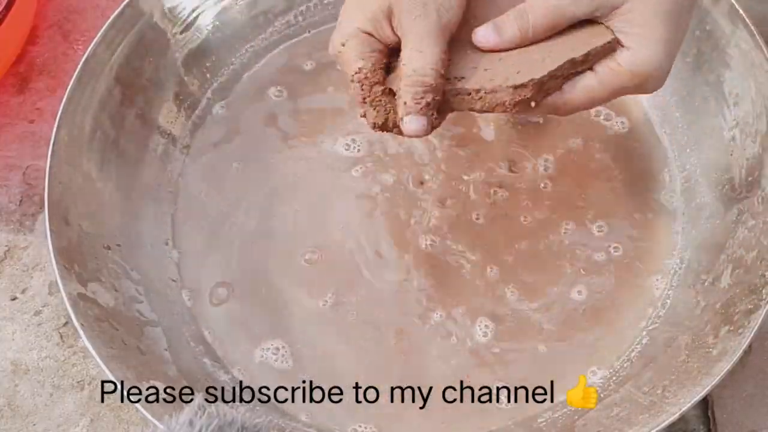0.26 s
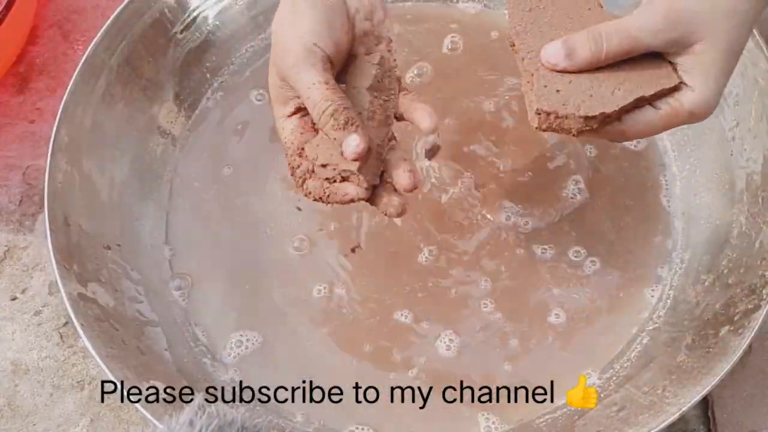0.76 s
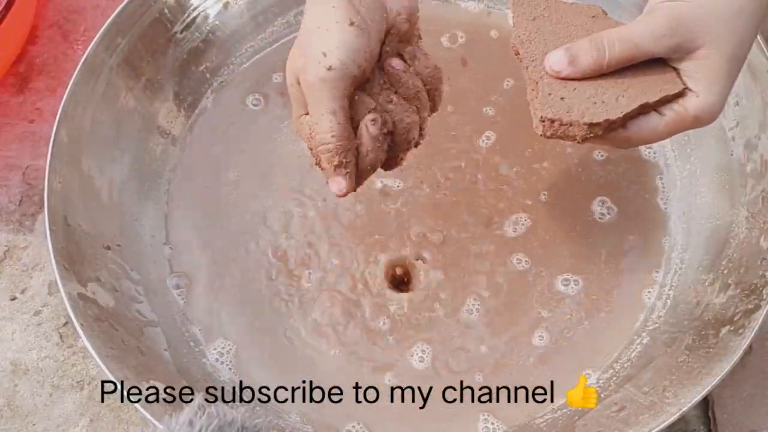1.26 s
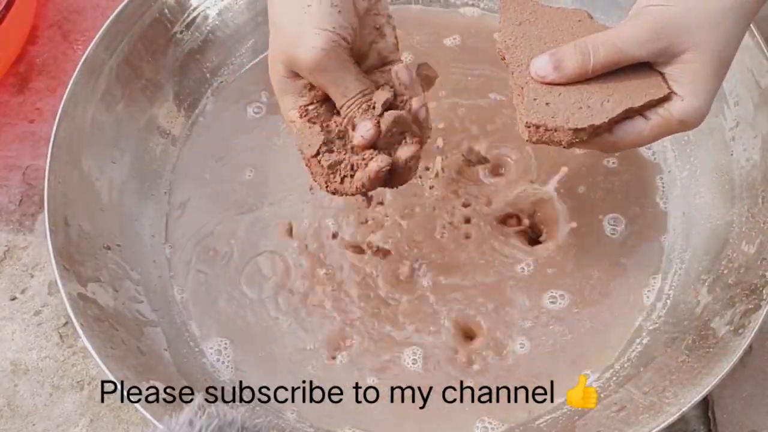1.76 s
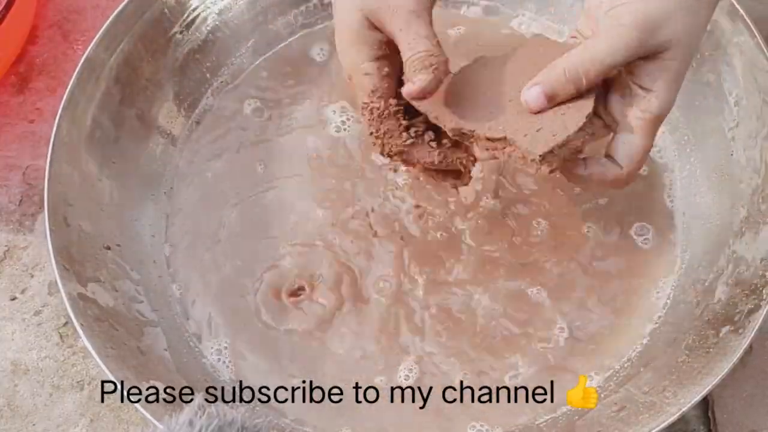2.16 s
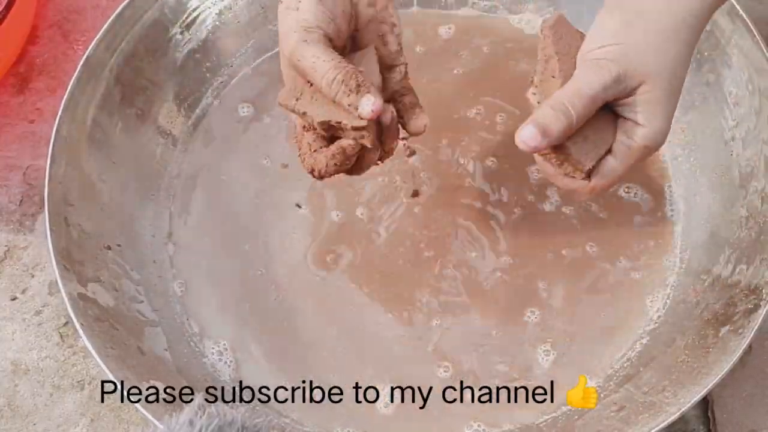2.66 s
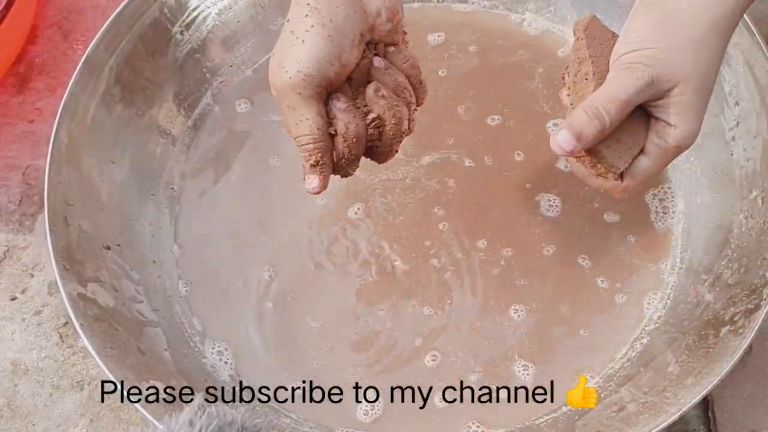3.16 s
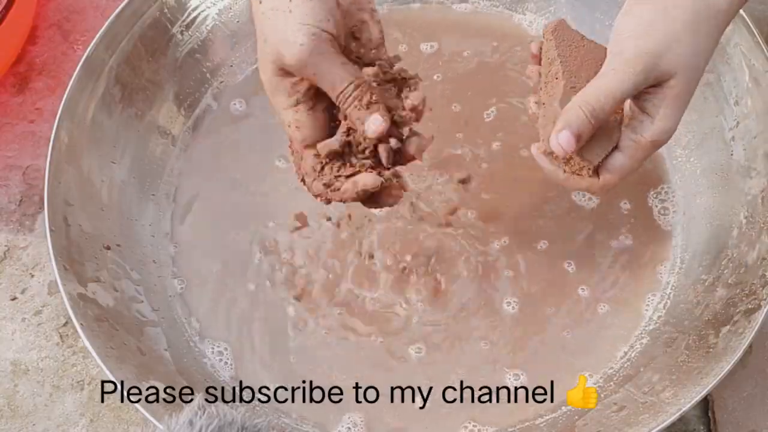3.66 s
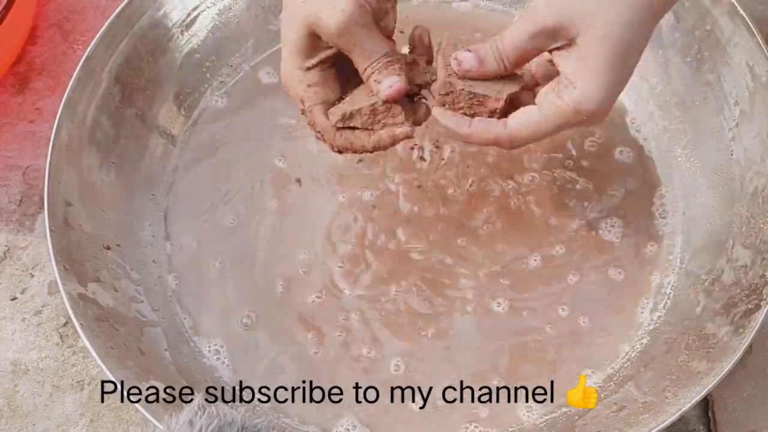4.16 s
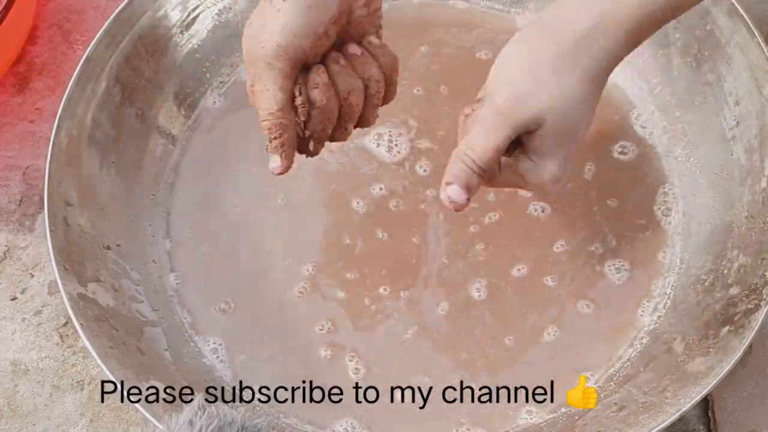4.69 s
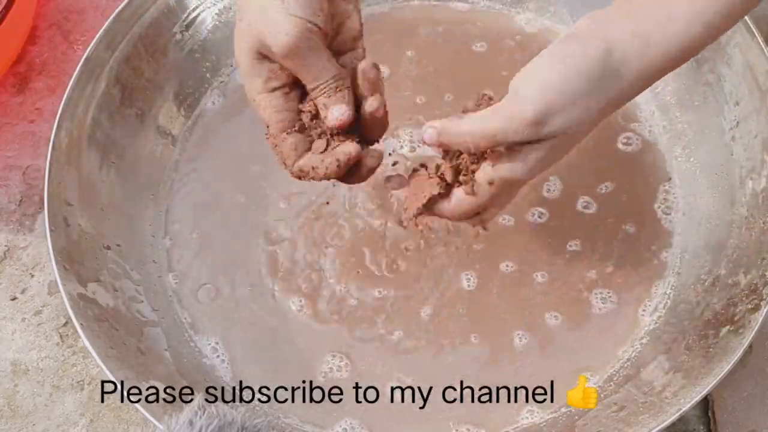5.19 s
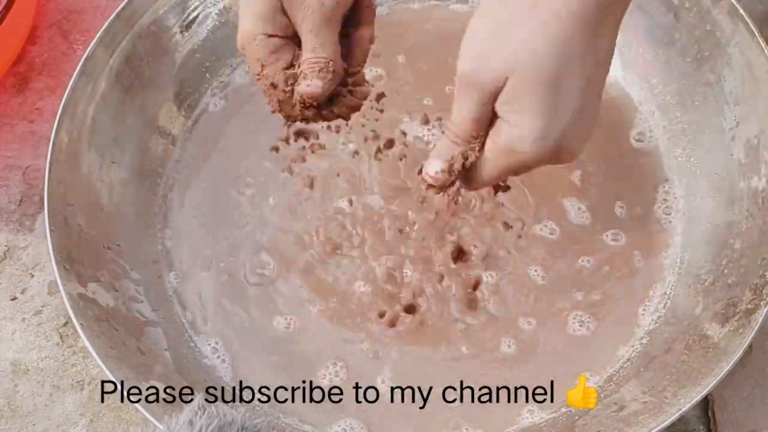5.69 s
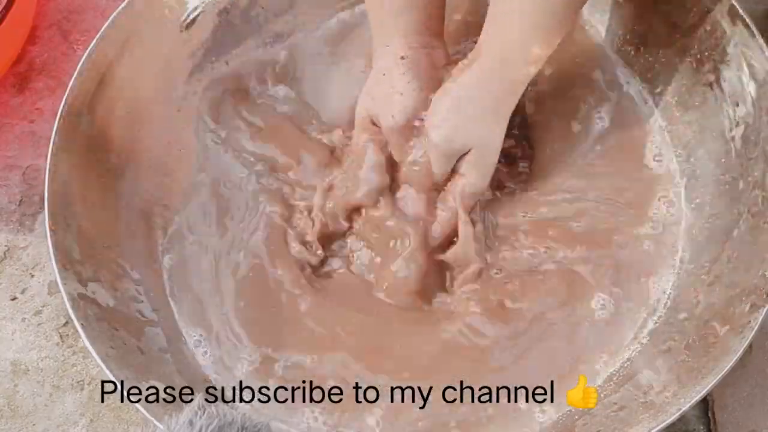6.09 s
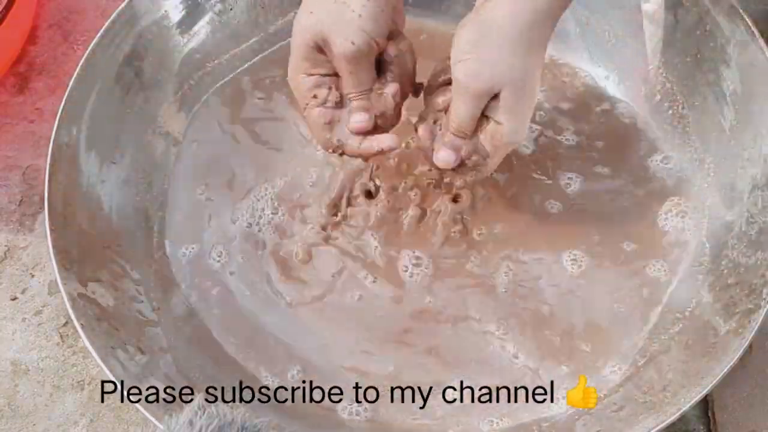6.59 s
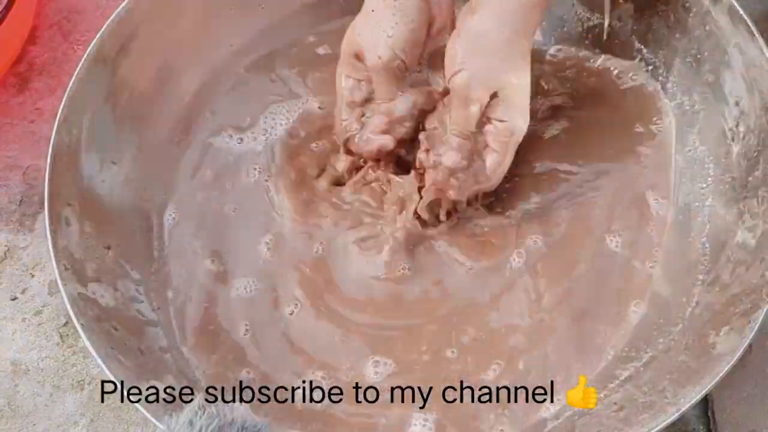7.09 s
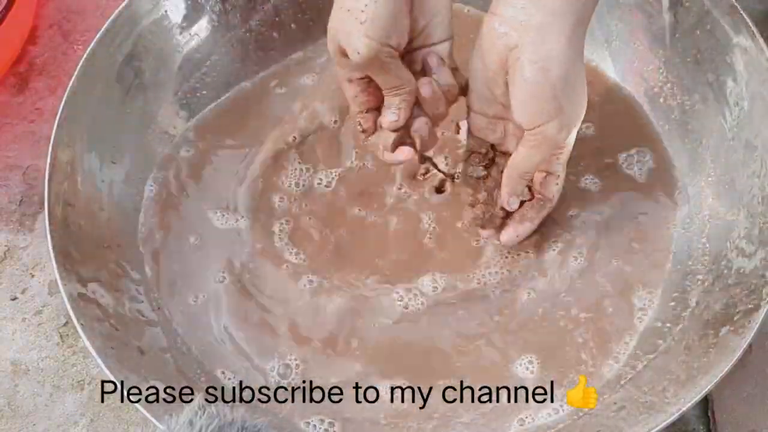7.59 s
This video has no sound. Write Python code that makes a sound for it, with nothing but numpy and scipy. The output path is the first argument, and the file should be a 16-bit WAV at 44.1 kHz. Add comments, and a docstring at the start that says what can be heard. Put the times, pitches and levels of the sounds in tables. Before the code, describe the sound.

Hands crumble a wet slab over a steel basin of water. Crumbs patter onto the surface in short showers, with sharp ticks, bubbly plops and a gritty fizz, and the fingers rasp softly in between. For the last two seconds or so the hands slosh and splash in the water. The sounds seem close, and a low rumble like wind or distant traffic lies underneath throughout.

```python
"""At a steel basin of water, hands crumble a wet slab. Crumbs and drops strike the surface with sharp
ticks, trap bubbles that plop and raise a gritty fizz; then the hands slosh in the water. Ticks are noise
bursts over a short ring, bubbles are damped sines, and fizz and slosh are patchy noise with swarms of
tiny bubbles. A low rumble, probably wind or traffic, lies under it all."""
import sys
import numpy as np
from scipy import signal
from scipy.fft import rfft, irfft, next_fast_len
from scipy.io import wavfile
from scipy.ndimage import uniform_filter1d, map_coordinates

SR = 44100
rng = np.random.default_rng(int(sys.argv[2]) if len(sys.argv) > 2 else 0)


def digitize_waveform(pressure):
    """Quantize a signal to 16-bit integers and store it at the path in sys.argv[1].

    Rows of a 2-D input are taken as channels; values are limited to [-1, 1].
    """
    field = np.atleast_2d(pressure).T
    bounded = np.clip(field, -1, 1)
    quanta = np.round(bounded * 32767).astype(np.int16)
    wavfile.write(sys.argv[1], SR, quanta)


N = 345744

# crumbs hitting the water: t/s, level/dB, ring f/Hz, edge level/dB (relative; higher is sharper)
CRUMB_HITS = [(0.0389, -13, 3470, -20), (0.063, -13, 2000, -34), (0.156, -10.5, 3980, -41),
              (0.168, -19, 1860, -16.5), (0.2588, -17.5, 2620, -44), (0.4146, -15, 4000, -39),
              (0.6913, -12, 2480, -31), (0.736, -18.5, 3900, -21.5), (0.852, -32.5, 4060, -19.5),
              (1.05, -22.5, 2190, -26.5), (1.2292, -15, 2000, -24), (1.3286, -8.5, 4180, -45),
              (1.3634, -15.5, 4870, -23.5), (1.441, -10, 2980, -52), (1.509, -1.5, 2970, -41),
              (1.52, -8.5, 2960, -45.5), (1.6792, -6.5, 4500, -34.5), (1.8314, -10, 3850, -20),
              (1.879, -24, 4230, -21.5), (1.9111, -3.5, 3820, -22), (1.981, -22, 4360, -18),
              (2.001, -6, 4140, -46), (2.077, -8, 2740, -36), (2.16, -18, 1780, -22.5),
              (2.3445, -10.5, 3670, -20), (2.369, -13, 4080, -28), (2.426, -14.5, 2000, -40.5),
              (2.497, -30, 3280, -26.5), (2.74, -19.5, 3360, -41), (3.045, -12, 3600, -21.5),
              (3.4428, -5.5, 3680, -41.5), (3.469, -6, 4150, -31), (3.5367, -8.5, 6400, -25.5),
              (3.6421, -2.5, 4140, -36.5), (3.7182, -26.5, 4160, -52), (3.7485, -7.5, 4690, -22.5),
              (3.7829, -2.5, 3040, -41.5), (3.888, -9.5, 4900, -30), (3.9584, -4, 6850, -27),
              (4.015, -2.5, 4400, -42), (4.08, -28.5, 2160, -4.5), (4.111, -11, 5040, -27.5),
              (4.2824, -15.5, 1866, -41), (4.401, -19.5, 4400, -40.5), (4.468, -21.5, 4750, -39),
              (4.518, -19, 4000, -37), (4.687, -11, 3090, -34), (5.112, -9.5, 5570, -32.5),
              (5.181, -20.5, 3200, -19.5), (5.385, -8, 1560, -32), (5.3902, -24, 3800, -29),
              (5.4495, -11.5, 3700, -23.5), (5.6146, -12.5, 5000, -16.5), (5.6345, -19, 4200, -18),
              (5.674, -8.5, 4250, -40.5), (5.7104, -25, 4270, -26), (5.738, -26, 3620, -18.5),
              (5.7534, -28.5, 4300, -14), (5.855, -6, 3800, -36), (5.9118, -10.5, 5000, -21.5),
              (6.1482, -12, 2600, -45), (6.1679, -1, 4460, -37.5), (6.261, -11.5, 4530, -18.5),
              (6.431, -11, 3800, -47), (6.4592, -11.5, 5270, -24.5), (6.505, -5, 3160, -39),
              (6.526, -4, 3670, -47.5), (6.559, -12, 2940, -30), (6.6282, -29, 4670, -11),
              (6.7302, -9, 3490, -39), (6.796, -14, 3550, -39), (6.8947, -11, 5400, -47),
              (7.051, -18.5, 3900, -21), (7.075, -14, 3200, -52), (7.155, -13.5, 5900, -28),
              (7.244, -8.5, 3980, -47), (7.3002, -9.5, 4400, -27), (7.444, -19, 3700, -17.5),
              (7.483, -11, 4100, -39), (7.645, -18, 2560, -42), (7.683, -13.5, 3620, -43.5)]
# EQ of the spray: f/Hz, level/dB
SPRAY_EQ = [(600, 0.5), (1500, -5), (2500, -7.5), (4200, -4.5), (6800, -5.5), (7700, -20.5), (12000, -44.5),
            (16200, -55.5)]
# EQ of the thin top of a sharp splash: f/Hz, level/dB
EDGE_EQ = [(5000, -34), (8000, -4.5), (13500, -10.5), (15400, -10), (16000, -29.5)]


def crumb_ticks():
    """Each crumb cracks the surface, rings a tiny bubble and throws a short spray of its own colour."""
    s, db, hz, edge_db = shed_bits(*np.transpose(CRUMB_HITS)[:, :, None])
    spray_cycles, snap_cycles = 67, 17.3  # to fall 60 dB: small, high drops die soonest
    t = np.arange(2000) / SR
    taper = np.hanning(2 * len(t))[len(t):]
    noise = rng.standard_normal((len(s), 3, len(t)))
    crack = decay(t, 0.0045)
    tail = decay(t, np.clip(spray_cycles / hz, .005, .15)) * (1 - np.exp(-t / 0.00077)) * taper
    burst = noise[:, 0] * (amp(2) * crack + amp(-2.5) * tail)
    tone = np.sin(2 * np.pi * hz * t)
    snap = tone * decay(t, snap_cycles / hz) * (1 - np.exp(-3 * t * hz))
    impact = amp(0.49 * (edge_db + 35.5)) * (burst + amp(2.5) * snap)
    # the surface rings in a noise band about 1 kHz wide, longer after a dull blow
    band = unit(uniform_filter1d(noise[:, 2], size=44, axis=1)) * tone
    ring_s = 0.068 * amp(-0.6 * (edge_db + 51.5))
    ring = band * decay(t, ring_s) * (1 - np.exp(-t / 0.0012)) * taper
    spray = place(s[:, 0], amp(db) * (impact + amp(-4) * ring))
    edge = place(s[:, 0], amp(db + edge_db + 15) * noise[:, 1] * decay(t, 0.0074))
    # the duller the blow, the louder and longer its plink
    plink_db = db - 8 - 0.77 * (edge_db + 39.5)
    plink_cycles = 7 * amp(-0.3 * (edge_db + 47))
    plink = bubbles(s[:, 0], plink_db[:, 0], hz[:, 0], plink_cycles, rise=0.0084, samples=1500)
    return coloured(spray, SPRAY_EQ) + coloured(edge, EDGE_EQ) + plink


def shed_bits(s, db, hz, edge_db):
    """Every crumb sheds two quieter bits: one lands just before it, one after, each with its own ring."""
    before_s, after_s = 0.006, 0.014
    when, smallness, tuning = rng.uniform(size=(len(s), 3, 2)).transpose(1, 0, 2)
    bit_s = np.maximum(s + (.3 + .7 * when) * [-before_s, after_s], 0)
    bit_db = db - 19 * (.5 + smallness)
    bit_hz = hz * (.8 + .5 * tuning)
    bit_edge_db = edge_db - 6 * smallness
    pairs = zip((s, db, hz, edge_db), (bit_s, bit_db, bit_hz, bit_edge_db))
    return [np.concatenate([crumb, bits.T.reshape(-1, 1)]) for crumb, bits in pairs]


def plops():
    """Bigger lumps trap bigger, lower bubbles, each with a weaker companion a moment later."""
    # large trapped bubbles: t/s, level/dB, f/Hz
    trapped = [(0.01, -9.5, 1030), (0.038, -4, 608), (1.227, -12, 763), (1.307, -22, 2530),
               (1.397, -15, 1320), (1.629, -12.5, 1000), (1.831, -3, 1007), (1.86, -9, 583),
               (2.294, -8.5, 990), (2.332, -10, 640), (3.454, -26, 2170), (3.538, -15.5, 1300),
               (3.642, -1.5, 525), (3.754, -5.5, 714), (3.827, -7.5, 960), (3.886, -3, 543),
               (3.931, -11, 596), (3.961, -13.5, 1060), (4.023, -9, 660), (4.113, -9.5, 626),
               (4.467, -13.5, 930), (5.116, -3.5, 796), (5.287, -18.5, 2410), (5.309, -17, 1810),
               (5.342, -26, 1950), (5.385, -7, 538), (5.677, -11.5, 1760), (5.763, -19, 1460),
               (5.813, -19, 1400), (5.844, -16, 1010), (5.857, -10, 990), (5.874, -11, 1150),
               (5.9, -11, 1370), (6.236, -15.5, 2230), (6.464, -9, 1030), (6.51, 0.5, 1020),
               (6.773, -13, 1980), (6.809, -13.5, 1670), (6.819, -12.5, 1080), (6.834, -6.5, 1060),
               (6.866, -13.5, 2320), (6.975, -13, 2030), (6.977, -14, 1020), (7.053, -6.5, 835),
               (7.072, -8, 850), (7.0858, -17, 2040), (7.117, -15, 1710), (7.142, -12, 910),
               (7.1549, -10.5, 1860), (7.296, -10, 1180), (7.712, -8, 915)]
    s, db, hz = np.transpose(trapped)
    lag, detune = rng.uniform(size=(len(s), 2)).T
    companion_hz = hz * (.87 + .3 * detune)
    companion = bubbles(s + 0.009 * lag, db - 5, companion_hz, cycles=2.6, rise=0.025, samples=1500)
    return bubbles(s, db, hz, cycles=3 * hz[:, None] / 1000, rise=0.013, samples=1500) + companion


def fizz_and_slosh():
    """Grit and droplets patter, fingers rasp and the water churns, all riding the hands' movement."""
    # EQ of fingers grinding wet grit: f/Hz, level/dB
    rasp_eq = [(2200, -34.5), (3500, 4.5), (4500, 6.5), (6500, -5), (7600, -51.5)]
    churn_eq = [(400, -31), (900, -7), (1800, -10), (3200, -24), (6000, -47.5)]  # f/Hz, level/dB
    fizz_db, slosh_db = stirring()
    flutter = amp(3.2 * wobble(42) + 5.5 * np.clip(wobble(160), -3, 1.8))
    hiss = unit(coloured(flutter * patchy(depth_db=8, bins=8, frames=3), SPRAY_EQ))
    grit = swarm(count=3000, hz=4060, octaves=0.59, spread_db=8.5, cycles=1.55, samples=250)
    grit = unit(coloured(grit, SPRAY_EQ))
    burble = swarm(count=4500, hz=1521, octaves=0.674, spread_db=5, cycles=5.9, samples=1200)
    churn = unit(coloured(patchy(depth_db=11, bins=3, frames=3), churn_eq))
    rasp = unit(coloured(patchy(depth_db=6.5, bins=6, frames=3), rasp_eq))
    spatter = amp(-1.5) * hiss + amp(0.5) * grit + amp(-17) * fine_spatter()
    # sharp spatter belongs to the busy moments; gentle squeezing mostly rasps
    busy = amp(0.6 * np.clip(fizz_db + 36, -30, 6))
    fizz = amp(-2) * rasp + busy * spatter
    slosh = amp(0.2) * burble + amp(0.5) * churn
    return amp(fizz_db) * fizz + amp(slosh_db) * slosh


def stirring():
    """Fizz and slosh envelopes in dB: each shower sets in fast, holds and fades; the loudest rules."""
    # crumb showers, finger rasps and hand splashes: t/s, hold/s, fizz level/dB, slosh over fizz/dB
    showers = [(0.0, 0.11, -35, 2), (0.233, 0.048, -37, -8), (0.288, 0.055, -46.5, -15.5),
               (0.689, 0.0072, -37, 2.5), (0.827, 0.11, -53.5, -26), (1.023, 0.079, -45, -21),
               (1.242, 0.081, -42, -16.5), (1.388, 0.071, -41.5, -2), (1.495, 0.052, -35.5, -7),
               (1.566, 0.15, -38.5, -5.5), (1.762, 0.15, -37.5, -2.5), (1.955, 0.22, -36.5, -10.5),
               (2.256, 0.091, -33.5, -2.5), (2.834, 0.19, -54, -14.5), (3.022, 0.2, -43.5, -5),
               (3.412, 0.26, -44, -3.5), (3.754, 0.29, -35, -0.5), (4.103, 0.06, -42.5, -5),
               (4.524, 0.25, -46, -3), (4.909, 0.14, -39.5, -3), (5.234, 0.09, -41, -16),
               (5.364, 0.026, -34, -10.5), (5.423, 0.16, -42, -3.5), (5.657, 0.307, -33.5, -6.5),
               (6, 0.19, -36, -4), (6.159, 0.12, -33, -2.5), (6.295, 0.17, -39, -7.5),
               (6.463, 0.133, -34.5, 0), (6.623, 0.12, -39.5, 1.5), (6.794, 0.09, -31, -3.5),
               (6.923, 0.05, -37, -9), (6.969, 0.065, -34, 3), (7.051, 0.12, -30, 1.5),
               (7.221, 0.23, -36.5, -1.5), (7.532, 0.43, -41, -3)]
    attack_db_per_s, release_db_per_s = 708, 362
    still_fizz_db, still_slosh_db = -63, -58  # the water left alone
    t = np.arange(0, N, 64) / SR
    s, hold, held_db, slosh_over_db = np.transpose(showers)[:, :, None]
    attack_db = attack_db_per_s * np.maximum(s - t, 0)
    release_db = release_db_per_s * np.maximum(t - s - hold, 0)
    shower_db = held_db - attack_db - release_db
    fizz_db = np.maximum(shower_db.max(0), still_fizz_db)
    slosh_db = np.maximum((shower_db + slosh_over_db).max(0), still_slosh_db)
    return per_sample(t, fizz_db), per_sample(t, slosh_db)


def fine_spatter():
    """The finest droplets crackle around the sharpest blows and are gone between them."""
    count, fade_db_per_s = 1300, 254
    drops = np.zeros(N)
    drops[rng.integers(0, N, size=count)] = amp(7.8 * np.minimum(rng.exponential(1, size=count), 2.5))
    envelope = signal.fftconvolve(drops, decay(np.arange(400) / SR, 0.0058))[:N]
    crackle = unit(coloured(envelope * rng.standard_normal(N), EDGE_EQ))
    t = np.arange(0, N, 64) / SR
    s, db, _, edge_db = np.transpose(CRUMB_HITS)[:, :, None]
    near_blow_db = 0.5 * (db + edge_db + 37.5) - fade_db_per_s * np.abs(t - s)
    return amp(per_sample(t, near_blow_db.max(0))) * crackle


def rumble():
    """Probably wind or traffic: two wavering beds of low noise that swell briefly three times."""
    # EQ of the deep bed: f/Hz, level/dB
    deep_eq = [(20, -25.5), (81, 0), (204, -7.5), (300, -21.5), (390, -28), (660, -120)]
    # EQ of the upper bed: f/Hz, level/dB
    upper_eq = [(120, -36.5), (220, 3.5), (500, -6), (1000, -19.5), (1500, -34), (2500, -47.5), (6000, -78)]
    # swells of the rumble: t/s, hold/s, deep lift/dB, upper lift/dB, release/s
    swells = [(0.0, 0.086, 5, 11, 0.18), (0.628, 0.017, 7.5, 2.5, 0.045), (3.031, 0.079, 6, 12.5, 0.14)]
    attack_s, climb_db_per_s = 0.011, 0.5332
    t = np.arange(N) / SR
    s, hold, deep_lift, upper_lift, release_s = np.transpose(swells)[:, :, None]
    swell = np.exp(-np.maximum(s - t, 0) / attack_s - np.maximum(t - s - hold, 0) / release_s)
    deep = unit(coloured(rng.standard_normal(N), deep_eq))
    upper = unit(coloured(rng.standard_normal(N), upper_eq))
    deep_db = -19 + (deep_lift * swell).sum(0) + 0.36 * wobble(11)
    upper_db = -30.5 + climb_db_per_s * t + (upper_lift * swell).sum(0) + 1.1 * wobble(14)
    return amp(deep_db) * deep + amp(upper_db) * upper


def bubbles(s, db, hz, cycles, rise, samples):
    """Trapped air rings as damped sines; most climb a little in pitch, each by its own amount."""
    turns = np.arange(samples) / SR * hz[:, None]
    decay_cycles = cycles * 2 ** (0.5 * np.clip(rng.standard_normal((len(s), 1)), -2, 0.7))
    age = turns / decay_cycles
    glide = rise * (1 + 1.74 * rng.standard_normal((len(s), 1)))
    tone = np.sin(2 * np.pi * turns * (1 + glide * np.minimum(age, 3)))
    envelope = np.exp(-age) * (1 - np.exp(-4 * turns)) * np.hanning(2 * samples)[samples:]
    return place(s, amp(db)[:, None] * tone * envelope)


def swarm(count, hz, octaves, spread_db, cycles, samples):
    """Many small bubbles at random moments, a few far louder than the rest; rms 1."""
    s = rng.uniform(0, N / SR, count)
    pitch = np.clip(hz * 2 ** (octaves * rng.standard_normal(count)), 300, 6400)
    db = spread_db * np.minimum(rng.exponential(1, count), 3.1)
    return unit(bubbles(s, db, pitch, cycles, rise=0.019, samples=samples))


def patchy(depth_db, bins, frames):
    """Noise broken into small patches of pitch and time, as from many overlapping droplets."""
    spectrum = signal.stft(rng.standard_normal(N), nperseg=256)[2]
    patches = uniform_filter1d(rng.standard_normal(spectrum.shape), size=bins, axis=0)
    patches = uniform_filter1d(patches, size=frames, axis=1)
    return signal.istft(spectrum * amp(depth_db * unit(patches)), nperseg=256)[1][:N]


def coloured(x, eq):
    """x through a minimum-phase EQ drawn by points of f/Hz, level/dB."""
    m = next_fast_len(N + SR // 2)
    hz, db = np.transpose(eq)
    gain = amp(np.interp(np.log(np.fft.rfftfreq(m, 1 / SR) + 1), np.log(hz), db))
    cepstrum = irfft(np.log(gain), m)
    cepstrum[1:m // 2] *= 2
    cepstrum[m // 2 + 1:] = 0
    return irfft(rfft(x, m) * np.exp(rfft(cepstrum)), m)[:N]


def place(s, sounds):
    """Mix of short sounds, one per row, starting at times s."""
    at = np.round(s * SR).astype(int)[:, None] + np.arange(sounds.shape[1])
    return np.bincount(at.ravel(), sounds.ravel(), N)[:N]


def wobble(rate):
    """A smooth random curve, rate knots a second."""
    knots = rng.standard_normal(int(N * rate / SR) + 4)
    return map_coordinates(knots, [np.arange(N) * rate / SR])


def per_sample(t, values):
    return np.interp(np.arange(N) / SR, t, values)


def decay(t, t60):
    return amp(-60 * t / t60)


def amp(db):
    return 10 ** (np.asarray(db) / 20)


def unit(x):
    return x / np.sqrt(np.mean(x ** 2) + 1e-20)


def scene():
    """The water in its basin over the rumble, in mono."""
    water = crumb_ticks() + plops() + fizz_and_slosh()
    return (water + rumble())[None]


def record(dry):
    """A soft clip rounds off the loudest peaks; a steep low-pass cuts the very top."""
    ceiling, top_hz = 1.05, 16800
    soft = dry / (1 + np.abs(dry / ceiling) ** 4) ** (1 / 4)
    m = next_fast_len(N + SR // 2)
    passband = np.fft.rfftfreq(m, 1 / SR) < top_hz
    return irfft(rfft(soft, m) * passband, m)[:, :N]


dry = scene()
out = record(dry)
digitize_waveform(out)
```